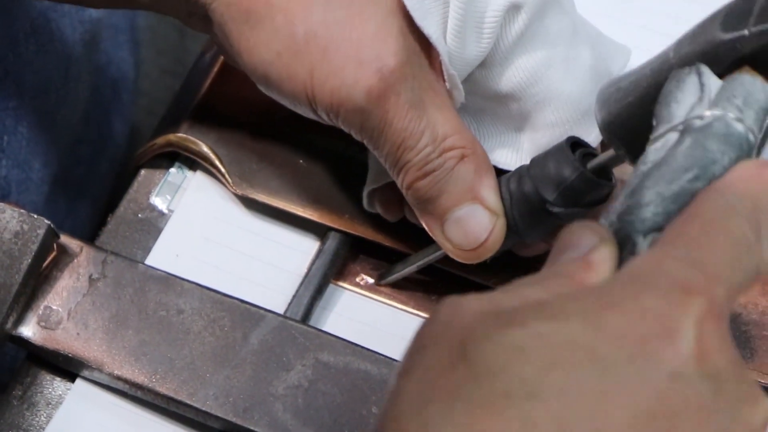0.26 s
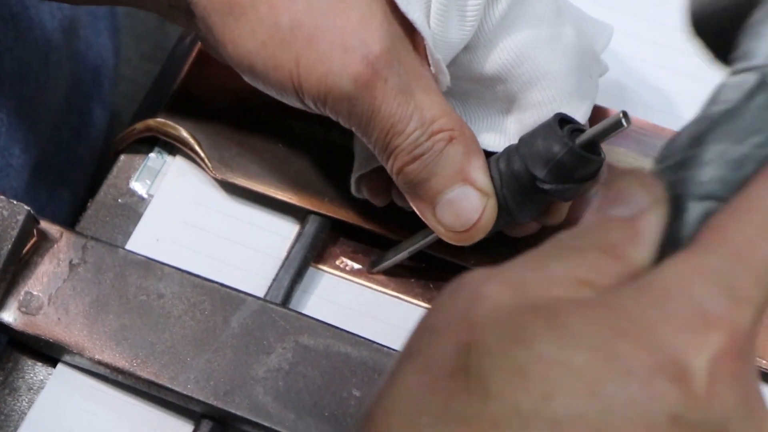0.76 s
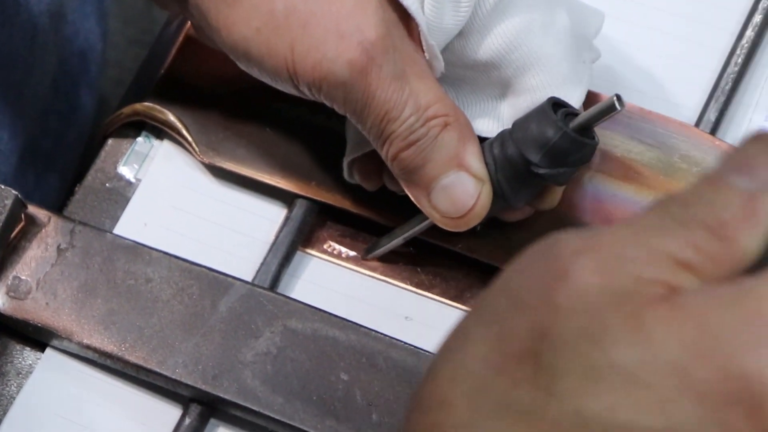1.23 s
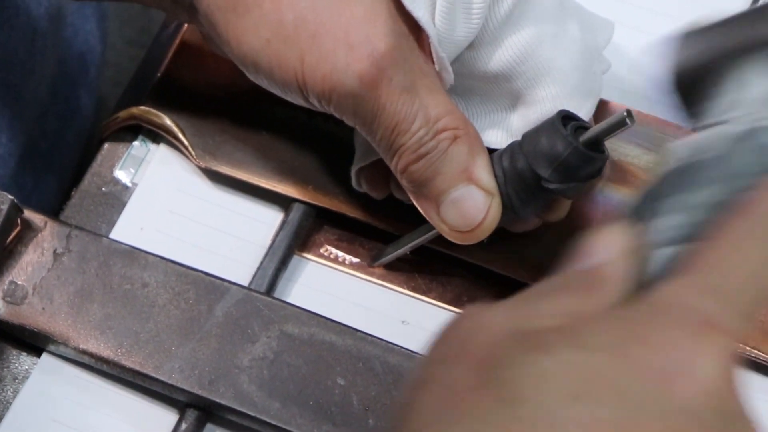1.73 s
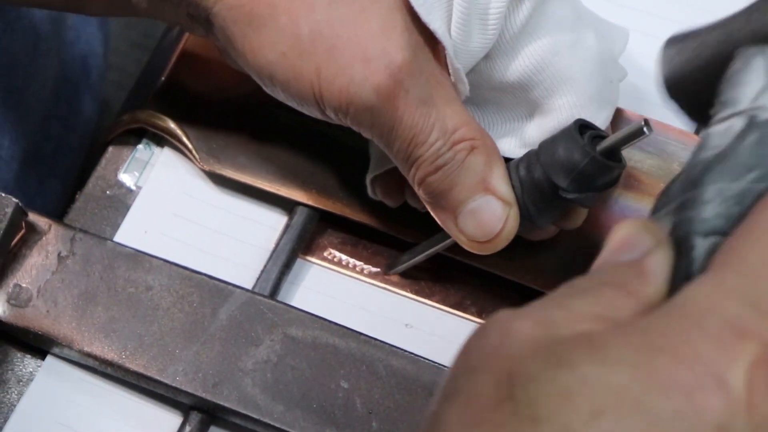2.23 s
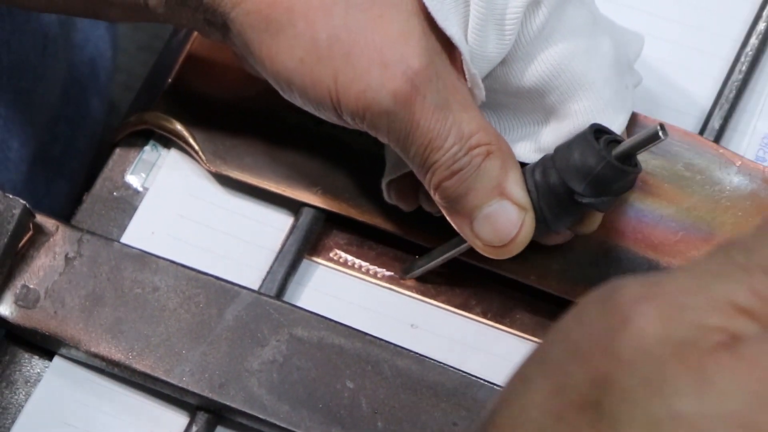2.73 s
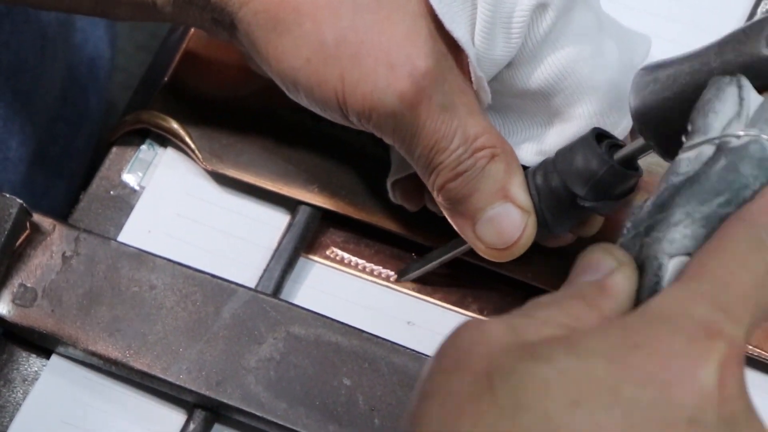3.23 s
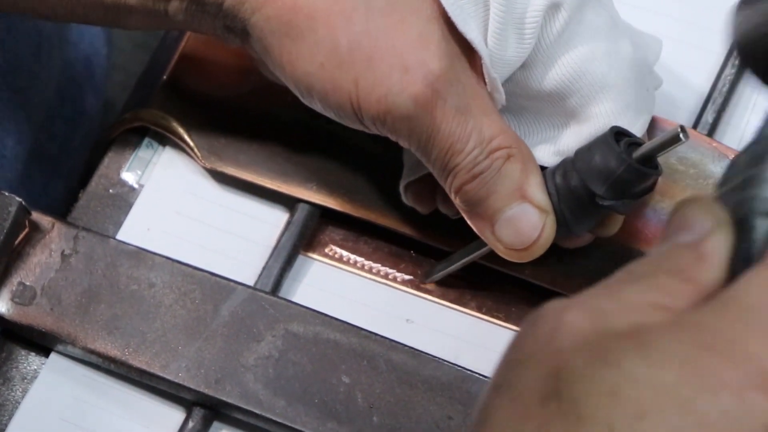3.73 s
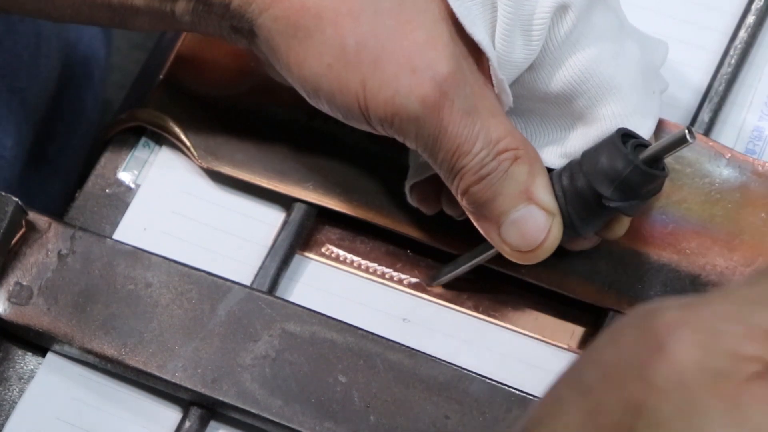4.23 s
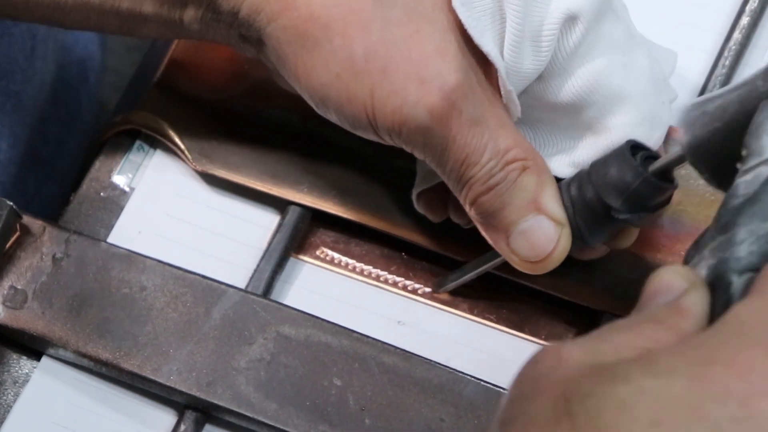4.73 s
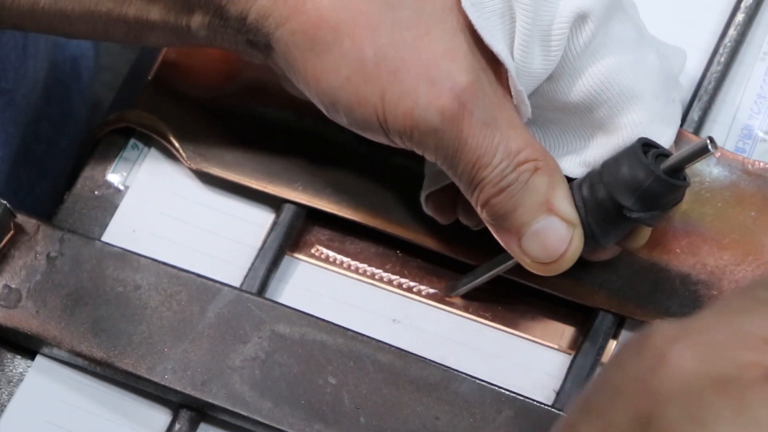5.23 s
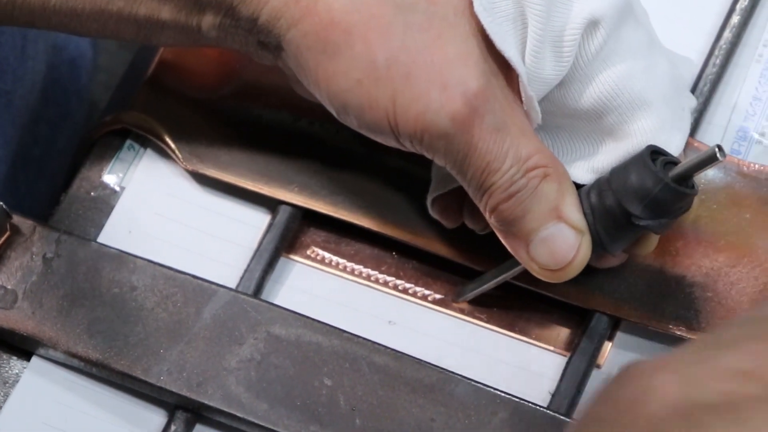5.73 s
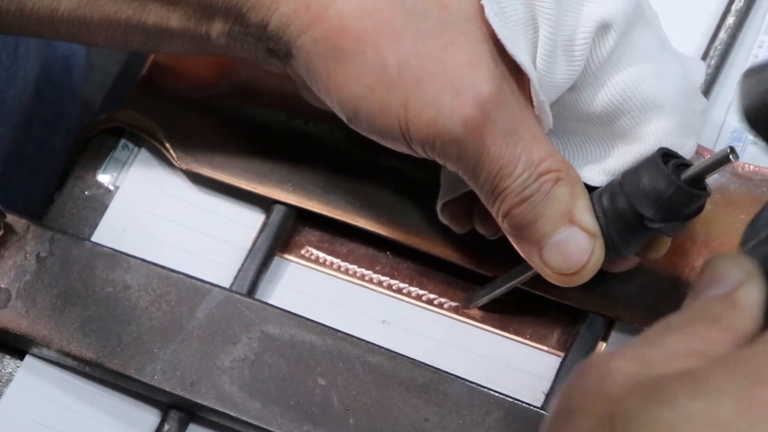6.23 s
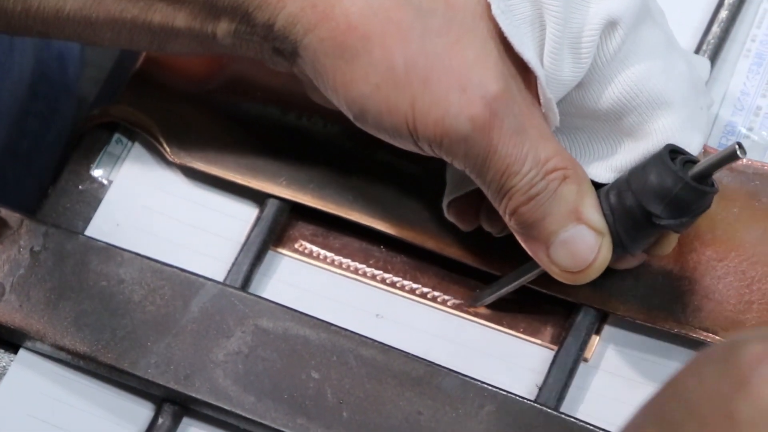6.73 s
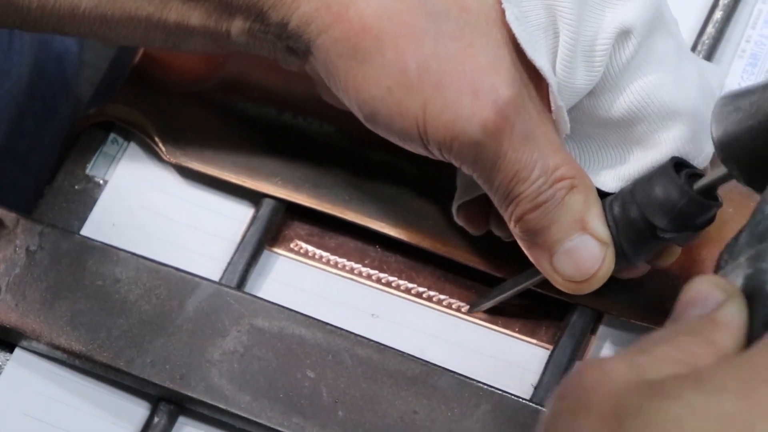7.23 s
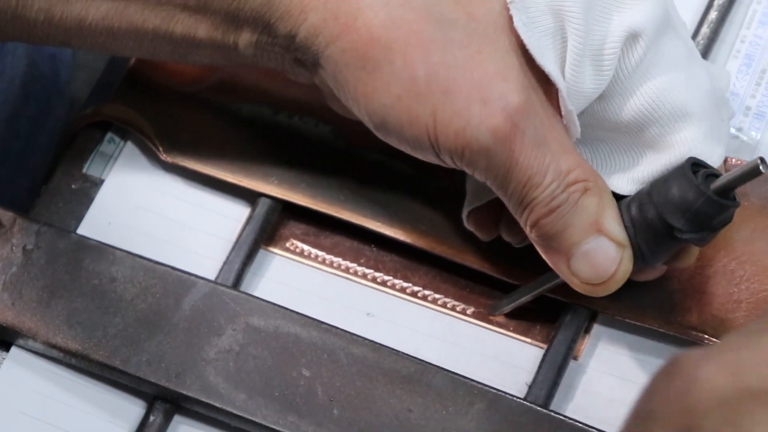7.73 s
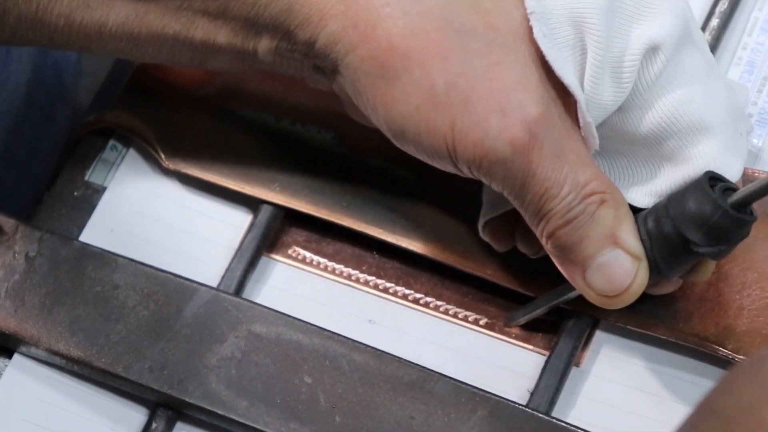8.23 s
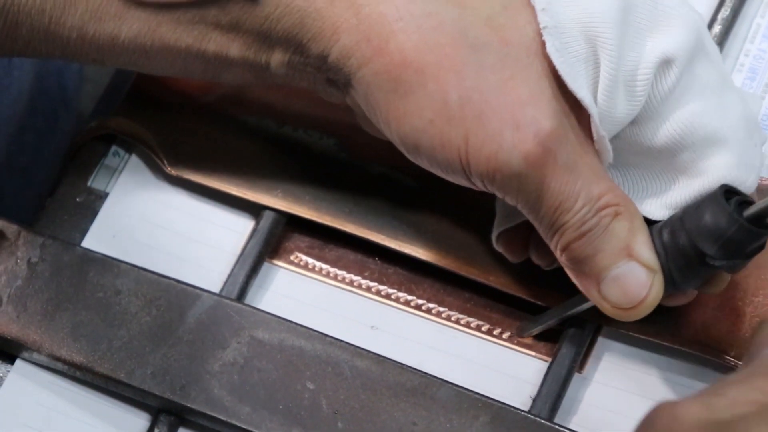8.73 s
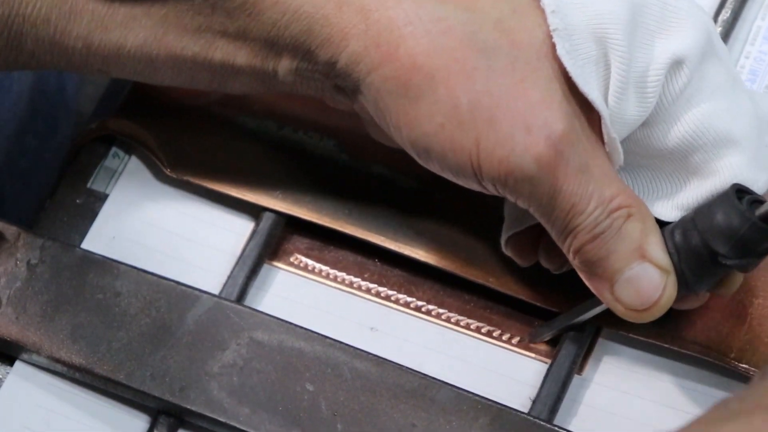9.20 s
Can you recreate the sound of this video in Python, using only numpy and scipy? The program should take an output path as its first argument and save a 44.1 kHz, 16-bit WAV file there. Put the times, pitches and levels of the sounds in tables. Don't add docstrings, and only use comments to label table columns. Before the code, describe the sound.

Regular chisel tapping in a small workshop over quiet low room tone. The first blows come about 0.4 seconds apart, then settle slightly faster. Each has a clicking attack, dense metallic ring damped within milliseconds, and a woody thump beneath. Around the middle the grip shifts, with small ticks, and the tone moves toward clamp and hammer head. Close stereo microphone, harshly clipped peaks, short dry reverberation, final light ticks.

```python
import sys
import numpy as np
from scipy import signal
from scipy.io import wavfile

SR = 44100
rng = np.random.default_rng(int(sys.argv[2]) if len(sys.argv) > 2 else 0)


def rack_gain(trim_db):
    fader = np.asarray(trim_db, float)
    return 10 ** (fader / 20)


def persist_wave(psi):
    counts = np.round(np.clip(psi, -1, 1) * 32767).astype(np.int16)
    wavfile.write(sys.argv[1], SR, np.atleast_2d(counts).T)


N = 417186

# frequency in Hz, level in dB.
AIR_COLOUR = [(20, 0), (45, 2.5), (140, -1.5), (400, -8), (1000, -9), (6000, -21.5), (15000, -29.5),
              (16500, -45)]
# frequency in Hz, left-right likeness of the room tone from 0 to 1.
AIR_LIKENESS = [(60, 0.25), (130, 0.47), (290, .15), (3000, .02)]
AIR_DB = -52
NOISE_EDGES_HZ = np.geomspace(22, 18000, 24)

# start in seconds, strength in dB, extra shank ring of an off-centre hit in dB.
BLOWS = [(0.2547, 0.5, 0.5), (0.6793, -0.5, 1.5), (1.0813, 1, 2), (1.455, 0.5, 0.5), (1.836, 0.5, -0.5),
         (2.216, 1.5, -1.5), (2.5793, 0.25, 0.5), (2.946, 0.5, -.5), (3.3093, 0.9, -0.5),
         (3.686, 0.55, 0.7), (4.0488, 0.9, -0.5), (4.4088, 0.6, -1), (4.7681, -0.9, 0), (5.1341, -1, 0),
         (5.4936, -0.75, 1.5), (5.862, -0.8, 2), (6.2201, -0.3, 0.5), (6.584, -0.54, -1.5),
         (6.9445, -0.8, -1), (7.3075, -0.4, -1.5), (7.67, -0.5, 2), (8.0332, -1, 2), (8.3977, -0.6, 2.5),
         (8.7617, -0.7, 1.5), (9.1395, -1, 0)]
SNAP_DB, SNAP_LOW_HZ, SNAP_HIGH_HZ = 18, 700, 14000

# frequency at the start in Hz, frequency at the end in Hz,
# level at the start in dB, level at the end in dB, left-right difference in dB.
CLAMP_AND_SHEET = [(760, 720, -12, -7, -6.5), (870, 890, -9.5, -15.5, -7), (1125, 1101, -2, -4.5, 3),
                   (1437, 1445, -8.5, -4.5, 5), (1956, 2030, 1.5, -3.5, -10.5),
                   (2270, 2300, -6.5, -2, -1.5), (2656, 2577, 0.5, 0.5, -15), (2931, 2900, 3, -4.5, -5),
                   (3052, 3300, 3.5, -1.5, -4.5), (3520, 3650, -8.5, -2, 4.5)]
# start Hz, end Hz, start dB, end dB, left-right dB.
HAMMER_HEAD = [(4183, 4230, -4.5, -3.5, -5.5), (4620, 4600, -7.5, -2.5, 2.5), (5080, 5070, -5, -2.5, 11),
               (5462, 5550, 2, -1, -11.5), (6012, 6030, 0, 3, 4.5), (6316, 6300, 0, -1.5, -0.5),
               (6930, 6100, -3.5, -2, -6.5)]
# start Hz, end Hz, start dB, end dB, left-right dB.
SHANK = [(7470, 7300, -1, -3.5, -5), (7877, 7800, 1, -1.5, -1), (8285, 8250, 2, -0.5, 0),
         (8556, 8700, 2, 0, 0.5), (8820, 9050, -1, 0, -3), (9780, 9700, -5, -1.5, 0.5),
         (10790, 10500, -12.5, -9, -1), (11010, 12000, -12.5, -6.5, -4), (11735, 11000, -11.5, -6.5, -2.5),
         (13030, 13000, -13, -13.5, -0.5), (14100, 8600, -16.5, -16.5, -1.5),
         (15400, 25000, -18, -17.5, -1)]
PART_HZ = [1950, 3100, 5800, 8500]
# frequency in Hz, level in dB, T60 in seconds.
RINGING = [(1402, -27, .24), (1965, -31, 0.26), (2860, -33, .2), (3080, -34, .18)]
# delay in seconds, level in dB.
REBOUNDS = [
    (0, 0),
    (.0021, -5),
    (.0080, -17),
]
# time in seconds, centre in Hz, lift in dB.
FREE_SHANK = [(.25, 7350, 6.5), (1.1, 7944, 5.5), (2.3, 8525, 8.5), (3.4, 8270, 6.5), (4.399, 7780, 4.5),
              (5.4, 7700, 2), (9.2, 8810, 2)]
# time in seconds, centre in Hz, lift in dB.
FREE_CLAMP = [(.25, 2000, -3.5), (1.8, 1930, -0.5), (4.6, 1980, 3.5), (6.8, 2040, 0), (9.2, 2050, -4)]
FREE_WIDTH = 0.047
FIRST_HOLD_DB, SECOND_HOLD_DB = (-1.8, 3, -1.8, 2), (2.7, .7, 3, 2)
REGRIP_S, REGRIP_LENGTH_S = 4.4, 0.99
GRIP_T60_S = .017
DRIVE_DB, SCATTER_DB, CRACK_DB = 0, 1.5, 4
SPREAD_DB, EARLY_LOSS_DB_PER_T60, SPREAD_TOP_HZ = 7, 150.5, 9500

# frequency in Hz, level in dB, delay of the trough in seconds, swell width in seconds.
THUMP = [(340.4, -2, 0.005326, .0021), (480, -11, 0.00512, 0.0024)]
# delay in seconds, level in dB.
THUMP_ECHOES = [
    (0, 0),
    (.0122, -19),
    (.0190, -20),
    (.040, -26),
    (.163, -41),
    (.179, -41),
]
# frequency in Hz, level in dB, T60 in seconds.
BENCH_MODES = [(195.3, -39.5, .6), (217.3, -36, 0.43), (249.5, -35, 0.67), (280.2, -33, 0.56),
               (295.4, -28.5, .4), (312.2, -27, .4), (352, -33.5, 0.44), (386.5, -30.5, .4),
               (409.4, -36, 0.39), (448, -35, .4), (528, -37.5, 0.34), (674, -40, .4)]
BENCH_DB, BENCH_GAIN_DB_PER_S = -7, 1.02

# frequency in Hz, level in dB, further loss in dB per second, left-right likeness.
ROOM_COLOUR = [(104, -22.5, -20.5, 0.46), (230, 6, -27, .8), (400.3, -3.5, -23, 0.97),
               (870, -1.5, -4.5, 0.46), (3000, -3, 11, 0.17), (6600, -5.5, 0.5, 0.4),
               (10290, -2.5, 31.5, 0.05), (15000, -2.5, 39, .1)]
ROOM_DB, RING_ROOM_DB, BENCH_ROOM_DB = -48, -12, -11
FIRST_WALL_S, BUILD_S, EARLY_DB, EARLY_S = 0.011, 0.0048, 5.5, 0.0073
LOSS_DB_PER_S, KNEE_S, KNEE_DB_PER_S = 126, .15, 168.5
LATE_DB, LATE_DB_PER_S = -21.5, 62.5
SLAP_S, SLAP_DB, SLAP_WIDTH_S = 0.062, 6.5, 0.0015

# start in seconds, peak in dB, pitch in Hz, bright part in dB,
# length in seconds.
TICKS = [
    (1.298, -40, 450, -40.5, 0.033),
    (1.79, -39.5, 600, -40, 0.052),
    (2.187, -45, 900, -40.5, .02),
    (4.295, -39.5, 450, -50, .025),
    (5.006, -33.5, 600, -2, 0.016),
    (5.056, -30, 1500, -20.5, .01),
    (5.057, -31.5, 500, -47, 0.057),
    (9.3562, -27, 2000, -13.5, .02),
    (9.405, -40, 1600, -28, .02),
    (9.4192, -31, 1900, -14, .03),
]

OVERLOAD, LOW_CUT_HZ, TOP_CUT_HZ = 1, 40, 15900


def at_hz(rows, hz, order=1):
    rows = np.array(rows)
    return np.interp(np.log(hz), np.log(rows[:, 0]), rows[:, order])


def add(out, sound, s):
    at = round(s * SR)
    out[..., at:at + sound.shape[-1]] += sound[..., :N - at]


def band_pass(x, low_hz, high_hz, order):
    sos = signal.butter(order, [low_hz, high_hz], "band", fs=SR, output="sos")
    return signal.sosfilt(sos, x)


def bands(size, gain, likeness):
    settle = 4000
    out, white = 0, rng.standard_normal((2, 2, size + settle))
    for k, (low_hz, high_hz) in enumerate(zip(NOISE_EDGES_HZ, NOISE_EDGES_HZ[1:])):
        mid, side = band_pass(white[k % 2], low_hz, high_hz, 2)[:, settle:]
        hz = np.sqrt(low_hz * high_hz)
        alike = np.clip(likeness(hz), 0, 1)
        stereo = np.sqrt(1 + alike) * mid + np.sqrt(1 - alike) * side * [[1], [-1]]
        out = out + gain(hz) * stereo
    return out


def air():
    noise = bands(N, lambda hz: rack_gain(at_hz(AIR_COLOUR, hz)), lambda hz: at_hz(AIR_LIKENESS, hz))
    return rack_gain(AIR_DB) * noise / noise.mean(0).std()


def snap():
    s, strength_db, _ = np.transpose(BLOWS)
    clicks = np.zeros(N)
    clicks[(s * SR).astype(int)] = rack_gain(SNAP_DB + strength_db)
    return band_pass(clicks + 1e-18, SNAP_LOW_HZ, SNAP_HIGH_HZ, 1)


def shares_db(s, strength_db, off_centre_db):
    moved = np.clip(.5 + (s - REGRIP_S) / REGRIP_LENGTH_S / 2, 0, 1)
    held = (1 - moved) * np.array(FIRST_HOLD_DB) + moved * np.array(SECOND_HOLD_DB)
    return held + strength_db + off_centre_db * np.array([0, 0, 0, 1])


def freed_db(hz, s):
    lift = 0
    for at, centre_hz, lift_db in (np.transpose(FREE_SHANK), np.transpose(FREE_CLAMP)):
        off_centre = (hz / np.interp(s, at, centre_hz) - 1) / FREE_WIDTH
        lift = lift + np.interp(s, at, lift_db) * np.exp(-off_centre ** 2)
    return lift


def metal():
    out, spread = np.zeros((2, N)), np.zeros((1, N))
    t = np.arange(SR // 4) / SR
    short = t[:SR // 25]
    modes = np.transpose(CLAMP_AND_SHEET + HAMMER_HEAD + SHANK)[:, :, None]
    hz0, hz1, db0, db1, pan_db = modes
    t60 = GRIP_T60_S * (hz0 / 3000) ** -.15
    skew = rng.uniform(-1, 1, hz0.shape) * np.minimum(hz0 / 4000, 1.3)
    rise_s = np.where(hz0 > 5000, .0006, .0001)
    rise = 1 - np.exp(-short / rise_s)
    facing = (-1) ** np.arange(len(hz0))[:, None]
    chance = rng.standard_normal((len(BLOWS), 6, len(hz0), 1))
    for (s, *blow_db), luck in zip(BLOWS, chance):
        part_db = shares_db(s, *blow_db)
        along = s * SR / N
        hz = (hz0 + along * (hz1 - hz0)) * (1 + .005 * luck[0])
        level_db = db0 + along * (db1 - db0)
        level_db = level_db + np.interp(np.log(hz), np.log(PART_HZ), part_db) + freed_db(hz, s)
        for k, (delay_s, db) in enumerate(REBOUNDS):
            loss_db = 60 * short / t60
            size = rise * rack_gain(DRIVE_DB + level_db + db + SCATTER_DB * luck[k + 1] - loss_db)
            phase = 2 * np.pi * hz * short + k * luck[5 - k]
            blow = []
            for side in (1, -1):
                wave = rack_gain(side * pan_db / 2) * np.sin(phase + side * skew / 2)
                blow.append(-(size * wave).sum(0))
            add(out, np.array(blow), s + delay_s)
        early = rack_gain(SPREAD_DB + level_db - EARLY_LOSS_DB_PER_T60 * short / t60)
        add(spread, (early * facing * np.sin(2 * np.pi * hz * short)).sum(0), s)
        for ring_hz, db, ring_t60 in RINGING:
            ring_db = np.interp(ring_hz, PART_HZ, part_db) + freed_db(ring_hz, s) + db
            add(out, rack_gain(ring_db - 60 * t / ring_t60) * np.sin(2 * np.pi * ring_hz * t), s)
    return out, spread


def crack():
    t = np.arange(SR // 30) / SR
    out, noise = np.zeros((2, N)), rng.standard_normal((len(BLOWS), 3, len(t)))
    for (s, strength_db, _), (mid, left, right) in zip(BLOWS, noise):
        size = rack_gain(CRACK_DB + strength_db - 60 * t / GRIP_T60_S)
        add(out, (mid + 1.1 * np.array([left, 1.1 * right])) * size, s + .0004)
    return band_pass(out, 600, 9000, 1)


def bench():
    t = np.arange(SR // 3) / SR
    thump = 0
    for hz, db, trough_s, width_s in THUMP:
        late = t - trough_s
        skewed_width = width_s * np.where(late > 0, 1.4, 1)
        swell = np.exp(-.5 * (late / skewed_width) ** 2)
        thump = thump - rack_gain(db) * swell * np.cos(2 * np.pi * hz * late)
    heard, out = np.zeros(N), np.zeros(N)
    for delay_s, db in THUMP_ECHOES:
        add(heard, rack_gain(db) * thump, delay_s)
    phases = rng.uniform(0, 2 * np.pi, len(BENCH_MODES))
    for (hz, db, t60), phase in zip(BENCH_MODES, phases):
        hum = rack_gain(db - 60 * t / t60) * np.sin(2 * np.pi * hz * t + phase)
        add(heard, hum * (1 - np.exp(-t / 0.016)), .004)
    for s, strength_db, _ in BLOWS:
        add(out, rack_gain(BENCH_DB + BENCH_GAIN_DB_PER_S * s + strength_db) * heard[:len(t)], s)
    return out


def workshop(dry):
    t = np.arange(SR * 7 // 20) / SR
    echoes = bands(len(t), lambda hz: rack_gain(at_hz(ROOM_COLOUR, hz) - at_hz(ROOM_COLOUR, hz, order=2) * t),
                   lambda hz: at_hz(ROOM_COLOUR, hz, order=3))
    since = t - FIRST_WALL_S
    steady_db = -LOSS_DB_PER_S * t - KNEE_DB_PER_S * np.maximum(t - KNEE_S, 0)
    late_db = LATE_DB - LATE_DB_PER_S * t
    early_db = EARLY_DB * np.exp(-np.maximum(since - BUILD_S, 0) / EARLY_S)
    slap_db = SLAP_DB * np.exp(-((t - SLAP_S) / SLAP_WIDTH_S) ** 2)
    db = np.maximum(steady_db, late_db) + early_db + slap_db
    build = (since > 0) * np.clip(.5 + .5 * since / BUILD_S, 0, 1)
    echoes = echoes * rack_gain(ROOM_DB + db) * build
    return signal.fftconvolve(dry.mean(0)[None], echoes)[:, :N]


def ticks():
    out, t = np.zeros((2, N)), np.arange(SR // 12) / SR
    for s, db, hz, bright_db, length_s in TICKS:
        burst = rng.standard_normal(len(t)) * rack_gain(-25 * t / length_s)
        body = band_pass(burst, hz / 1.5, hz * 1.5, 2)
        edge = band_pass(burst, 4500, 9000, 2)
        touch = body / abs(body).max() + rack_gain(bright_db) * edge / abs(edge).max()
        add(out, rack_gain(db) * touch, s)
    return out


def scene():
    (ring, spread), touches, thumps = metal(), ticks(), bench()
    spread_low = signal.butter(2, SPREAD_TOP_HZ, fs=SR, output="sos")
    spread = signal.sosfilt(spread_low, spread + 1e-18)
    to_room = spread + touches + rack_gain(RING_ROOM_DB) * ring + rack_gain(BENCH_ROOM_DB) * thumps
    wet = workshop(to_room) + workshop(snap()[None])
    return ring + crack() + touches + thumps + wet + air()


def low_pass(x):
    return signal.sosfilt(signal.butter(12, 16750, fs=SR, output="sos"), x)


def record(dry):
    flat = np.clip(dry, -OVERLOAD, OVERLOAD)
    flat = signal.sosfilt(signal.butter(1, LOW_CUT_HZ, "high", fs=SR, output="sos"), flat)
    flat = signal.sosfilt(signal.ellip(6, .3, 14, TOP_CUT_HZ, fs=SR, output="sos"), flat)
    return low_pass(flat)


dry = scene()
out = record(dry)
persist_wave(out)
```